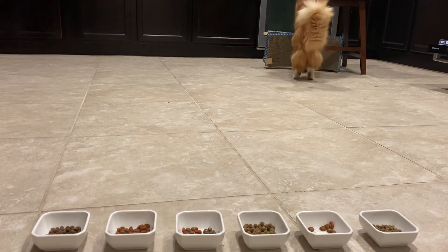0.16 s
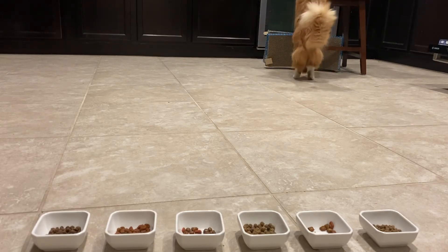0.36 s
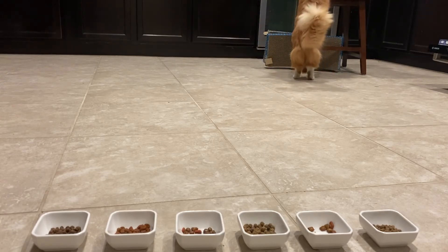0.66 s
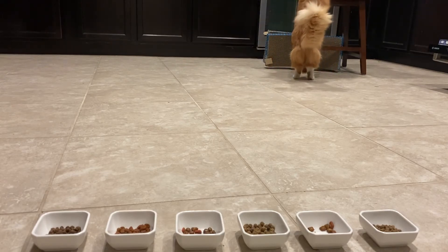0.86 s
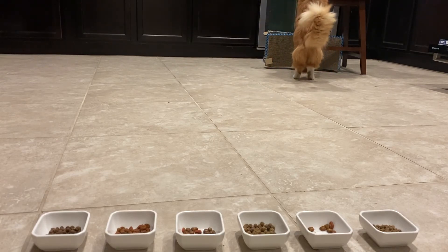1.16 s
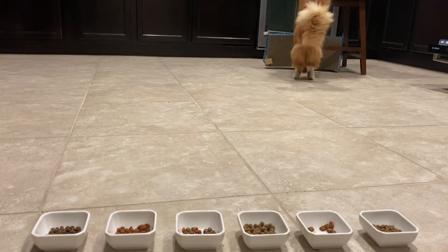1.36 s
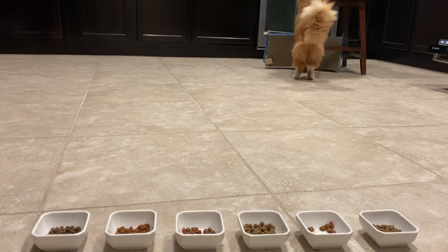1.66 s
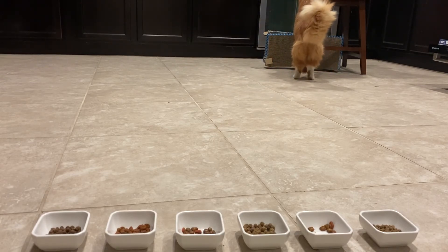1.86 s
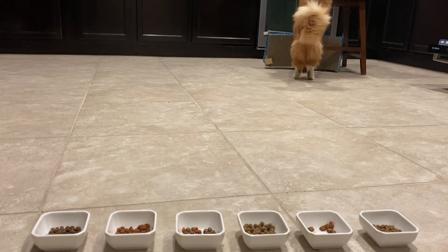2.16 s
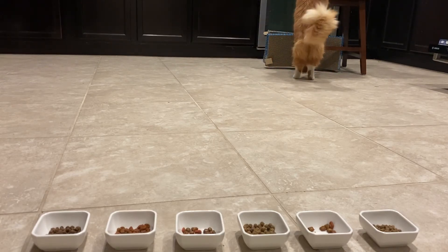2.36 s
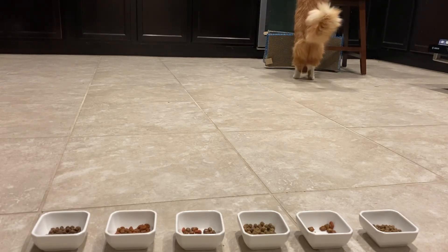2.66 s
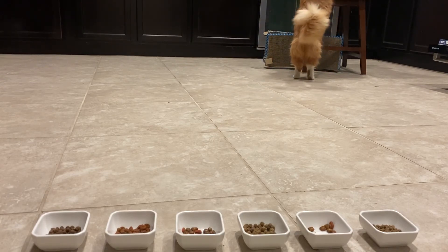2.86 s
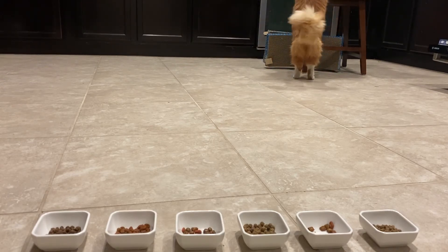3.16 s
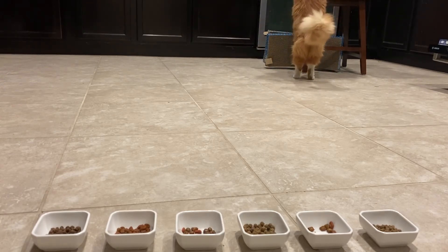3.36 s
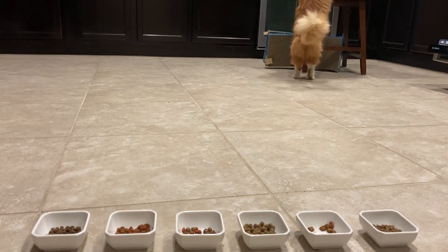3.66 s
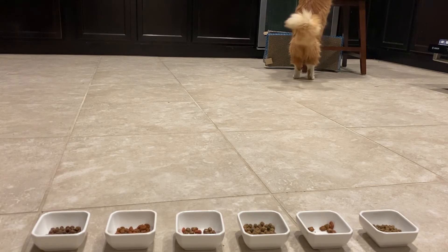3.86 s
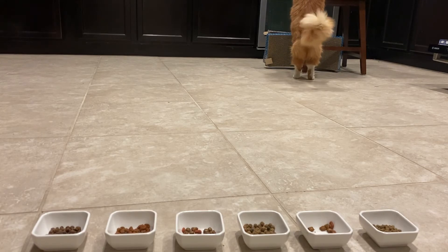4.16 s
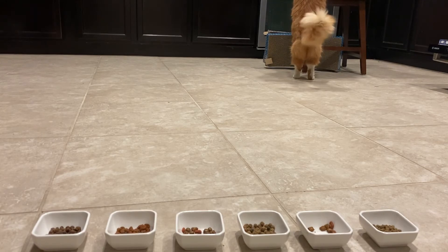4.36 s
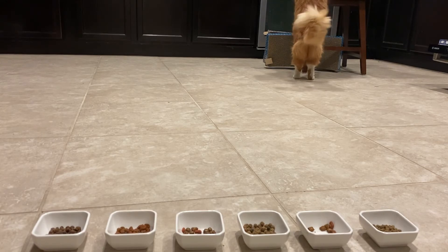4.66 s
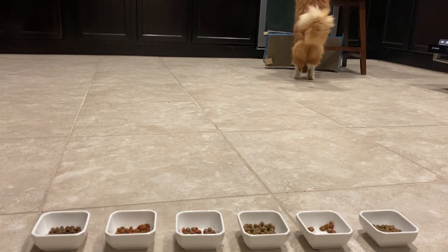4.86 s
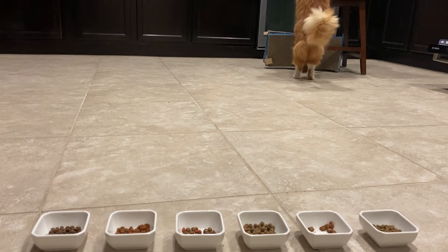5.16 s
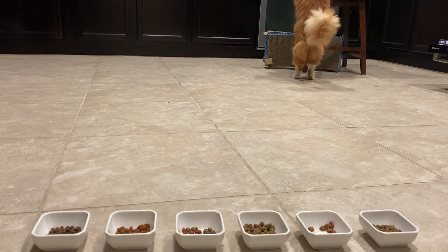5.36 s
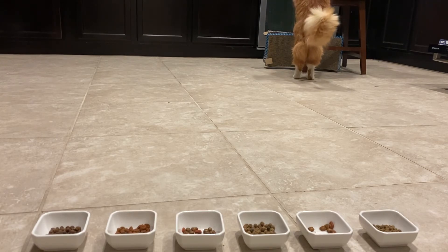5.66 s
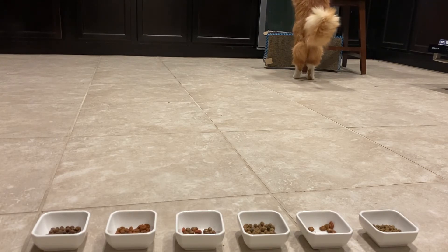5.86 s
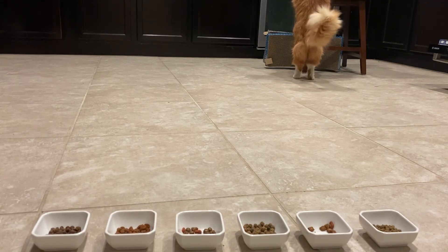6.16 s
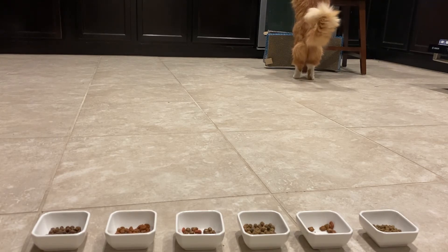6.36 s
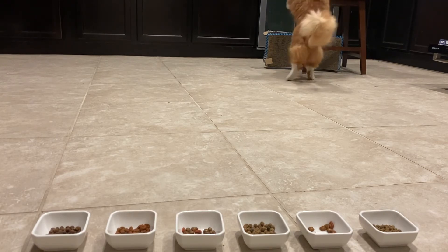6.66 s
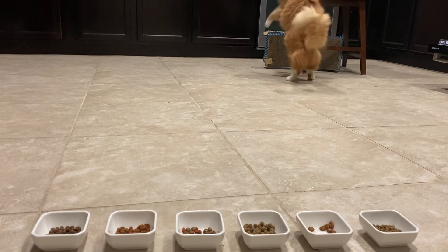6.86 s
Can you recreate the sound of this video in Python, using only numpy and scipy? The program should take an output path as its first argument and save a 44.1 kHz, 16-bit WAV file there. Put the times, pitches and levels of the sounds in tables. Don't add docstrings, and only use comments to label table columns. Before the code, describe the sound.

A cat claws at a cardboard box in a bare tiled kitchen, with sharp snaps, papery rasps and hollow thumps over a faint refrigerator hum.

```python
import sys
import numpy as np
from scipy import signal
from scipy.fft import rfft, irfft, next_fast_len
from scipy.io import wavfile
from scipy.ndimage import uniform_filter1d

SR = 44100
rng = np.random.default_rng(int(sys.argv[2]) if len(sys.argv) > 2 else 0)


def int16_out(signal):
    q = np.round(np.clip(np.atleast_2d(signal).T, -1, 1) * 32767)
    wavfile.write(sys.argv[1], SR, q.astype(np.int16))


def ratio(d):
    e = np.asarray(d, float) / 20
    return 10 ** e


N = 309141
LONG = next_fast_len(N + SR)

# start in seconds, level in dB.
THUMPS = [(0.292, -59), (0.396, -41.5), (1.07, -48.5), (1.174, -52.5), (1.286, -37), (1.384, -45.5),
          (1.48, -45), (1.57, -45), (1.656, -39), (1.805, -57), (2.085, -40), (2.13, -33), (2.269, -30),
          (2.524, -41.5), (2.681, -58), (2.724, -52.5), (2.879, -44.5), (2.975, -46), (3.252, -56.5),
          (3.254, -44.5), (3.35, -53), (3.424, -33.5), (3.969, -43), (4.405, -66), (4.927, -66),
          (5.635, -36.5)]
# frequency in Hz, width in Hz, level in dB.
BOX_AIR = [(107.5, 28, -6.5), (133.7, 61, 6.5)]
# frequency in Hz, width in Hz, level in dB.
BOX_PANELS = [(309, 56.3, 4.5), (273, 42, -8), (372.6, 41.2, -5.5), (429.7, 92, -9), (539.3, 63, -3.5),
              (623.6, 67, -3), (745.5, 144, -0.5), (894, 200, -16), (1047, 150, -4), (1314, 190, -5)]
# frequency in Hz, level in dB per Hz.
CARD_SNAP = [(150, -30), (400, -8), (600, -3), (1000, 0), (1400, 1), (2100, -5), (2700, -17), (4000, -36),
             (9000, -56)]
# frequency in Hz, level in dB per Hz.
CLAW_RAP = [(1000, -45), (1800, -16), (2350, -1), (2900, 0), (3500, -2), (4200, -20), (8000, -50)]
# frequency in Hz, level in dB per Hz.
CLAW_TICK = [(1500, -50), (3000, -20), (3700, -1), (4500, 0), (5300, -2), (6200, -9), (9000, -36),
             (16000, -60)]
# frequency in Hz, level in dB per Hz.
FIBRE_FIZZ = [(3000, -59), (4800, -21.5), (5900, 7.5), (7500, 7.5), (11000, -1.5), (15500, -7.5),
              (16200, -19), (16600, -59)]


def evened(x):
    return x / np.sqrt(np.mean(x ** 2) + 1e-20)


def read(points, hz):
    f, value = np.transpose(points)
    return np.interp(np.log(hz + 1), np.log(f + 1), value)


def causal(points):
    hz = abs(np.fft.fftfreq(2048, 1 / SR))
    log_gain = np.log(ratio(read(points, hz)) + 1e-5)
    phase = -signal.hilbert(log_gain).imag
    return np.fft.ifft(np.exp(log_gain + 1j * phase)).real[:1024]


def coloured_click(points):
    click = causal(points)
    return click / abs(click).max()


def ring(modes, rise_s):
    t = np.arange(4096) / SR
    out = np.zeros(len(t))
    for hz, width_hz, db in modes:
        out += ratio(db) * np.exp(-np.pi * width_hz * t) * np.sin(2 * np.pi * hz * t)
    out *= 1 - np.exp(-(t / rise_s) ** 2)
    return out / abs(out).max()


def still_air():
    # frequency in Hz, level in dB per Hz.
    air_colour = [(15, -68), (25, -29.5), (47, -8), (70, -2.5), (134, -21.5), (223, -20), (400, -28.5),
                  (750, -34.5), (2000, -45), (6400, -51), (12500, -54.5), (13500, -58), (16000, -66)]
    # time in seconds, level in dB, half width in seconds.
    surge = (4.8, -62.5, 0.12)
    air_db, hum_db = -74.5, -73.5
    shake_db, shake_rise_s, shake_fade_s = -20.5, 0.11, 0.16
    hz = np.fft.rfftfreq(LONG, 1 / SR)
    a, b = rng.standard_normal((2, 3, len(hz)))
    white = a + 1j * b
    colour = ratio(read(air_colour, hz))
    air = irfft(white[:2] * colour, LONG)[:, :N]
    air *= LONG / 2 / np.linalg.norm(colour[hz > 120])
    drone = evened(irfft(white[2] / (1 + ((hz - 62) / 8.5) ** 2), LONG)[:N])

    s, db = np.transpose(THUMPS)
    t = np.arange(N) / SR
    swell = (1 - np.exp(-t[:SR] / shake_rise_s)) * np.exp(-t[:SR] / shake_fade_s)
    landings = np.bincount(np.round(s * SR).astype(int), ratio(db + shake_db), N)
    shake = signal.oaconvolve(landings, swell)[:N]
    compressor = ratio(surge[1]) * np.exp(-((t - surge[0]) / surge[2]) ** 2)
    return ratio(air_db) * air + (ratio(hum_db) + shake + compressor) * drone


def room_reply(wet_db):
    # frequency in Hz, level in dB.
    skim = [(100, -3.5), (700, -8.5), (1100, -4), (1450, -0.5), (1900, -7.5), (3000, -10), (8000, -6),
            (16000, -3.5)]
    # delay in seconds, level in dB.
    echoes = [
        (.0048, -5),
        (.0075, -7),
        (.012, -9),
        (.0165, -10),
    ]
    # frequency in Hz, time to fall 60 dB in seconds.
    decay = [(60, 0.34), (200, 0.38), (400, 0.41), (700, 0.51), (1840, 0.44), (4850, 0.47), (10000, 0.33),
             (16000, 0.22)]
    # frequency in Hz, level in dB.
    walls = [(150, -3), (300, -4.5), (550, 3.5), (800, 4), (1500, 1), (8000, 0.5), (15000, 3)]
    taps = np.zeros((2, 30000))
    at = np.arange(200, 29980, 20) + rng.integers(0, 20, (2, 1489))
    np.put_along_axis(taps, at, rng.choice([-1., 1.], at.shape), 1)
    hz, t, z = signal.stft(taps, SR, nperseg=256)
    fade_db = read(walls, hz)[:, None] - 60 * t / read(decay, hz)[:, None]
    tail = signal.istft(z * ratio(fade_db), SR, nperseg=256)[1]
    tail *= ratio(wet_db) / np.linalg.norm(tail[0])
    tail[:, :1024] += causal(skim)
    for s, db in echoes:
        arrival = round(s * rng.uniform(.85, 1.15) * SR) + rng.integers(0, 12, 2)
        tail[[0, 1], arrival] += ratio(db) * rng.choice([-1, 1])
    return rfft(tail, LONG)


def room(x, count=4):
    reply_at = np.arange(N) / (SR * .17) % count
    out = 0
    for k in range(count):
        distance = abs((reply_at - k + count / 2) % count - count / 2)
        near = np.maximum(1 - distance, 0)
        out = out + rfft(x * near, LONG) * room_reply(wet_db=5.5)
    return irfft(out, LONG)[:, :N]


def gate(x, under_db, slope, most_db):
    hz, t, z = signal.stft(x, SR, nperseg=512)
    power = (abs(z) ** 2).mean(0)
    power = uniform_filter1d(uniform_filter1d(power, size=9, axis=0), size=3, axis=1)
    threshold_db = under_db - 6.0 * np.log2(hz[:, None] / 1000 + 0.6)
    short_db = threshold_db - 10 * np.log10(power + 1e-16)
    cut_db = np.clip(slope * short_db, 0, most_db)
    return signal.istft(z * ratio(-cut_db), SR, nperseg=512)[1][:, :N]


def thumps():
    s, db = np.transpose(THUMPS)
    blows = np.bincount(np.round(s * SR).astype(int), ratio(db - 2.5), N)
    return signal.oaconvolve(blows, ring(BOX_AIR, rise_s=0.012))[:N]


def pressure(s, db, fade_db_per_s):
    press_db_per_s = 145.5
    t = np.arange(0, N + 64, 64)[:, None] / SR - s
    gain = ratio(db + np.minimum(press_db_per_s * t, -fade_db_per_s * t)).sum(1)
    return np.repeat(gain, 64)[:N]


def drag():
    # full pressure in seconds, rasp in dB, shuffle of the box in dB.
    strokes = [(0, -85, -52), (.15, -62, -63), (.5, -57.5, -60.5), (.8, -81, -57.5), (1.35, -60, -58.5),
               (1.8, -59.5, -53.5), (2.19, -95, -45), (2.252, -62, -44.5), (2.7, -59, -56.5), (3, -59, -63),
               (3.3, -81, -66.5), (3.45, -62.5, -86), (3.9, -78, -78), (4.2, -91, -73), (5.62, -74, -81)]
    s, rasp_db, shuffle_db = np.transpose(strokes)
    slip_db = 4.0 * np.minimum(rng.exponential(1, (2, N)), 4)
    fine, coarse = ratio(slip_db) * rng.standard_normal((2, N))
    fine = fine * (rng.random(N) < 500 / SR)
    coarse = coarse * (rng.random(N) < 300 / SR)

    scrape = coloured_click(CARD_SNAP) + 0.76 * coloured_click(CLAW_RAP)
    scrape += 0.25 * coloured_click(CLAW_TICK) + 0.084 * coloured_click(FIBRE_FIZZ)
    box = ring(BOX_PANELS, rise_s=0.0016) + 0.19 * ring(BOX_AIR, rise_s=0.045)
    rasp = evened(signal.oaconvolve(fine, scrape)[:N])
    shuffle = evened(signal.oaconvolve(coarse, box)[:N])
    return (pressure(s, rasp_db - 5.5, fade_db_per_s=132) * rasp
            + pressure(s, shuffle_db - 0.5, fade_db_per_s=115) * shuffle)


def snaps():
    # start in seconds, snap in dB, then box boom, hard rap and
    # sharpness in dB against the snap.
    full_snaps = [(0, -36.5, -2, -4, -13.5), (0.108, -39, -21, -4, -11.5), (0.176, -39, 5, -18, -14.5),
                  (0.393, -23, -2.5, -8, -22), (0.545, -37.5, 4.5, -19, -15), (0.655, -39, -2, -13, -24),
                  (0.803, -38.5, -7, -28, -20), (1.279, -27.5, 2, -8, -10.5),
                  (1.657, -29.5, 11, -6.5, -6.5), (1.818, -40.5, 8.5, -36, -36),
                  (2.225, -33.5, -8, -15, -21.5), (2.265, -20.5, 6, -12.5, -16),
                  (2.356, -38.5, -14, -5.5, -12.5), (2.513, -37, 7.5, -17, -20),
                  (2.584, -42.5, -12, -7.5, -7), (2.713, -34.5, 0, -8.5, -18), (2.87, -21.5, 0, -7, -13.5),
                  (2.971, -28, -4, -6.5, -14), (3.25, -39.5, 16, -19.5, -35), (3.344, -32, 8.5, -8, -13),
                  (3.42, -18, 5, -23, -19), (3.965, -20, -0.5, -15.5, -22), (4.644, -43, 5, -8, -23),
                  (5.629, -24, 5.5, -25, -20.5)]
    # start in seconds, snap in dB, then box boom
    # and sharpness in dB against the snap.
    faint_snaps = [(0.018, -45, 1, -18), (0.049, -38.5, -14, -27), (0.591, -47, -34, -5.5),
                   (0.686, -47, 8, -12.5), (0.913, -49, 13.5, -11.5), (1.004, -54.5, -19, -17.5),
                   (1.071, -65, 15.5, -8), (1.226, -50, 12.5, -12.5), (1.48, -56, 19, -17),
                   (1.561, -56.5, 17.5, -11.5), (1.843, -43.5, 14, -33), (2.008, -55.5, -4.5, -4.5),
                   (2.064, -46.5, 13, -13.5), (2.113, -45.5, 22.5, -16), (2.168, -49, 26.5, -27),
                   (2.665, -55.5, -13, -6), (3.215, -54.5, 6, -19), (3.881, -59.5, -5, -36),
                   (3.926, -68, 21, -1.5), (5.586, -61, -14, -6), (5.609, -49.5, -21, -17),
                   (6.018, -69, -3, -2)]
    faint_rap_db = 1
    light = [(s, db, boom_db, sharp_db + faint_rap_db, sharp_db) for s, db, boom_db, sharp_db in faint_snaps]
    s, db, boom_db, rap_db, sharp_db = np.transpose(full_snaps + light)
    fizz_db = -1.5 + 1.168 * sharp_db
    tick_db = sharp_db + .35 * (rap_db - sharp_db)

    luck = rng.random((len(s), 3, 7))
    late_s = np.cumsum(0.0024 + luck[:, 0] * .005, axis=1)
    late_s[:, 0] = 0
    late_s[:, 4:] = -.001 - 0.0035 * luck[:, 0, 4:]
    size = np.sign(luck[:, 1] - .5) * 0.24 * luck[:, 2]
    size[:, 0] = 1
    size[:, 4:] *= .6
    at = np.clip(np.round((s[:, None] + late_s) * SR).astype(int), 0, N - 1)

    parts = [(0, coloured_click(CARD_SNAP), -2),
             (boom_db, ring(BOX_PANELS, rise_s=0.00085), -10),
             (rap_db, coloured_click(CLAW_RAP), 0),
             (tick_db, coloured_click(CLAW_TICK), 3),
             (fizz_db, coloured_click(FIBRE_FIZZ), 5)]
    out = np.zeros(N)
    for rel_db, body, trim_db in parts:
        force = ratio(db + rel_db + trim_db)[:, None] * size
        lag = rng.integers(0, 12)
        blows = np.bincount(at.ravel() + lag, force.ravel(), N)
        out += signal.oaconvolve(blows, body)[:N]
    return out


def scene():
    cat = snaps() + thumps() + drag()
    return gate(room(cat), under_db=-84, slope=1.5, most_db=20) + still_air()


def roll_off(x):
    return signal.sosfilt(signal.butter(12, 16520, fs=SR, output="sos"), x)


def record(dry):
    # frequency in Hz, likeness from 0 to 1.
    likeness = [(30, .99), (60, .985), (130, .95), (290, .8), (640, .5), (1400, .35), (1900, .2),
                (2300, .6), (4300, .58), (5500, .25), (7000, .9), (16000, .9)]
    # frequency in Hz, phase in radians.
    left_lead = [(60, 0), (200, -.35), (1200, -.8), (1550, -2), (1900, -.6), (2200, .35), (4600, .3),
                 (6000, 0)]
    # frequency in Hz, left minus right in dB.
    lean = [(30, -1.5), (80, -0.5), (180, -0.5), (350, -3.5), (700, 0), (1400, -0.5), (2800, 2), (4500, 4),
            (6500, 0.5), (16000, 0)]
    alike_hz, cycle_hz = 7050, 4120
    hz = np.fft.rfftfreq(LONG, 1 / SR)
    a, b = rfft(dry, LONG) / np.sqrt(1 + (38 / (hz + 1)) ** 4)
    spacing = 2 * np.pi * np.maximum(hz - alike_hz, 0) / cycle_hz
    lead = read(left_lead, hz) - spacing + 0.12 * np.sin(2 * spacing)
    same = np.clip(read(likeness, hz), 0, 1)
    turn = np.exp(.5j * lead) * ratio(read(lean, hz) / 2)
    left = a * turn
    right = (same * a + np.sqrt(1 - same ** 2) * b) / turn
    return roll_off(irfft(np.array([left, right]), LONG)[:, :N])


dry = scene()
out = record(dry)
int16_out(out)
```